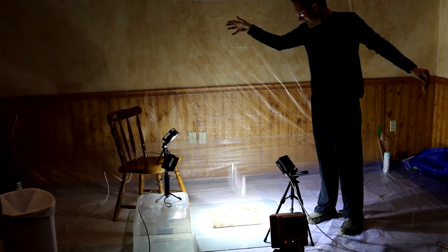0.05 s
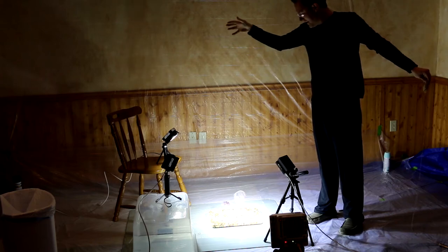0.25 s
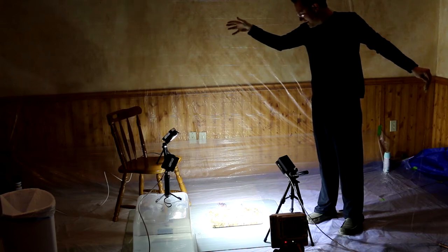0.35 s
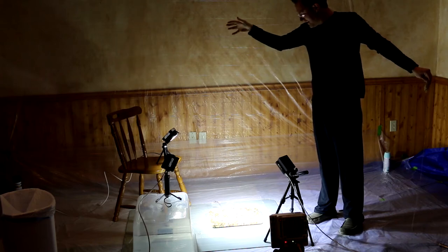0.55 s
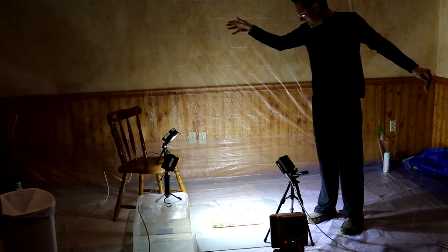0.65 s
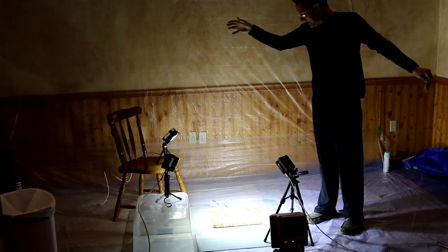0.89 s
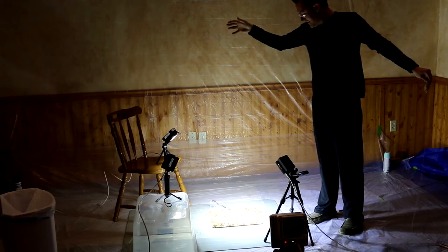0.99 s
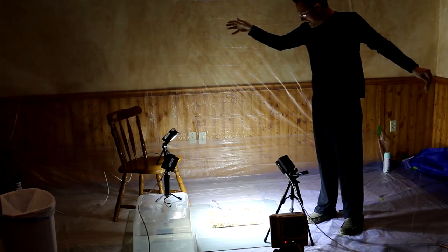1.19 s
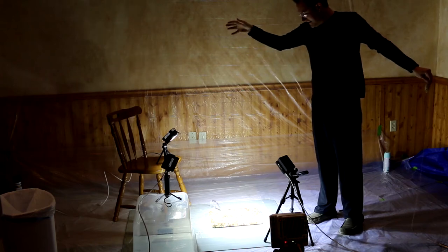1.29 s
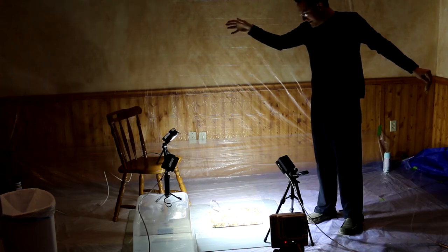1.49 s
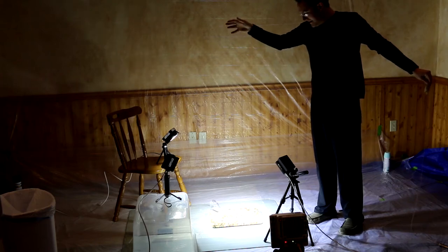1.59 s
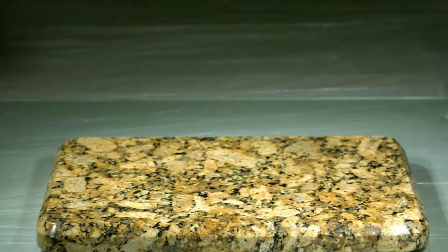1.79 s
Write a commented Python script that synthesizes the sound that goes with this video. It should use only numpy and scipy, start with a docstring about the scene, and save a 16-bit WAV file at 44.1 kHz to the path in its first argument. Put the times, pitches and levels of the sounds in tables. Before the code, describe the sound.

A glass smashes on a stone slab, then fragments clink and scatter in a small room.

```python
"""A small room lined with plastic sheet: a dropped glass smashes on a stone slab.
The bowl cracks, the slab knocks, and splinters and ringing shards spray out. Pieces thud and clatter
on the covered floor and slide, crackling the sheet. The largest rocks and clinks to rest.
Room tone and a low rumble lie underneath."""
import sys
import numpy as np
from scipy import signal
from scipy.fft import rfft, irfft
from scipy.io import wavfile

SR = 44100
rng = np.random.default_rng(int(sys.argv[2]) if len(sys.argv) > 2 else 0)


def generate_wav(sig):
    """Save sig (samples, or channels by samples) to the path in sys.argv[1] as 16-bit PCM at SR."""
    pcm = np.round(np.clip(np.atleast_2d(sig).T, -1, 1) * 32767).astype(np.int16)
    wavfile.write(sys.argv[1], SR, pcm)


N = 81585
T = np.arange(N) / SR
CUTOFF_HZ = 15900
SIDE = np.array([[1], [-1]])   # left, right sign

# left-right likeness: freq_hz, correlation
STEREO_CORRELATION = [(250, 0.99), (1200, 0.91), (2400, 0.7), (5000, 0.23), (14000, 0.15)]
# pieces hitting the floor: start_s, level_db, t60_s
FLOOR_HITS = [(0.4437, -17, 0.32), (0.4637, -12.5, 0.086), (.479, -25, 0.13), (0.6145, -16, 0.11),
              (0.625, -28.5, 0.15), (0.6758, -16.5, 0.093), (0.8422, -28, 0.2), (1.2902, -30, 0.14)]


def from_db(db):
    return 10 ** (np.asarray(db) / 20)


def unit_rms(x):
    return x / np.sqrt(np.mean(x ** 2) + 1e-20)


def at_hz(points, hz):
    """Table lookup on a log-frequency axis."""
    freqs_hz, values = np.transpose(points)
    return np.interp(np.log(hz), np.log(freqs_hz), values)


def low_cut(x, hz):
    return signal.sosfilt(signal.butter(2, hz, "high", fs=SR, output="sos"), x + 1e-18)


def level_curve(rows):
    """Gain over time, silent before the first point."""
    return from_db(np.interp(T, *np.transpose(rows))) * (T >= rows[0][0])


def decay(start_s, t60_s, attack_s=1e-5):
    """Quick rise, exponential fall."""
    age_s = np.maximum(T - start_s, 0)
    return (1 - np.exp(-age_s / attack_s)) * np.exp(-np.log(1000) * age_s / t60_s)


def bursts(rows):
    """Summed decay envelopes."""
    return sum(from_db(db) * decay(start_s, t60_s) for start_s, db, t60_s in rows)


def stereo(mid, side, hz):
    """Two unrelated signals to a pair, less alike in the treble."""
    correlation = at_hz(STEREO_CORRELATION, hz)
    return np.sqrt(1 + correlation) * mid + np.sqrt(1 - correlation) * side * SIDE


def coloured(white, spectrum):
    """Two white rows to stereo with this spectral shape; rms 1."""
    hz = np.maximum(np.arange(N // 2 + 1) * SR / N, 1)
    mid, side = rfft(white) * from_db(at_hz(spectrum, hz)) * (hz < CUTOFF_HZ)
    return unit_rms(irfft(stereo(mid, side, hz), N))


def noise(spectrum):
    return coloured(rng.standard_normal((2, N)), spectrum)


def grains(per_s, spread_db=1.5):
    """Random clicks of uneven size, two rows."""
    sizes = from_db(spread_db * np.minimum(rng.exponential(1, N), 4))
    return (rng.random(N) < per_s / SR) * sizes * rng.standard_normal((2, N))


def pings(spectrum, pieces, per_s=5000, t60_cycles=160, top_hz=6000):
    """Random contacts dealt to small pieces of glass, one resonance each; rms 1."""
    clicks = grains(per_s)
    piece_hit = rng.integers(0, pieces, N)
    pitches_hz = np.geomspace(1500, top_hz, pieces) * rng.uniform(.98, 1.02, pieces)
    out = 0
    for piece, hz in enumerate(pitches_hz):
        radius = np.exp(-np.log(1000) * hz / (t60_cycles * SR))
        angle = 2 * np.pi * hz / SR
        contacts = stereo(*clicks, hz) * (piece_hit == piece)
        ring = signal.lfilter([1, 0, -1], [1, -2 * radius * np.cos(angle), radius ** 2], contacts + 1e-18)
        out += from_db(at_hz(spectrum, hz)) * angle * ring
    return unit_rms(out)


def wavering_tone(hz):
    """Sine with wandering level and phase; the channels differ more as pitch rises."""
    depth, step, warmup_steps = .7, 64, 200
    waver_hz = 10 + 4 * hz / 1000
    pole = np.exp(-2 * np.pi * waver_hz * step / SR)
    white = rng.standard_normal((4, N // step + warmup_steps))
    slow = unit_rms(signal.lfilter([1], [1, -2 * pole, pole ** 2], white)[:, warmup_steps:])
    drifts = [np.interp(T * SR / step, np.arange(len(row)), row) for row in slow]
    sin_mid, cos_mid, sin_side, cos_side = drifts
    width = .95 * min(hz / 2800, 1) * SIDE
    sin_gain = 1 + depth * (sin_mid + width * sin_side) / 2
    cos_gain = depth * (cos_mid + width * cos_side) / 2 + width * rng.choice([-.5, .5])
    phase = 2 * np.pi * hz * T
    return unit_rms(sin_gain * np.sin(phase) + cos_gain * np.cos(phase)) / np.sqrt(2)


def background():
    """Steady room tone and a low rumble that swells and dips."""
    # room tone: freq_hz, density_db
    air_spectrum = [(25, -19), (55, -22), (125, -6), (213, -16.5), (1240, -23.5), (2200, -19), (8000, -36),
                    (15000, -50)]
    # rumble: freq_hz, density_db
    rumble_spectrum = [(30, -43.5), (60, -11), (118, 0), (150, -2), (200, -22.5), (900, -41.5)]
    # time_s, level_db
    rumble_levels = [(0, -45), (.2, -42.5), (.235, -34.5), (.29, -45.5), (.8, -51), (1.1, -44), (1.32, -37),
                     (1.45, -47), (1.58, -37.5), (1.76, -38)]
    return from_db(-45) * noise(air_spectrum) + level_curve(rumble_levels) * noise(rumble_spectrum)


def reverb(x, wet_db):
    """The room's short diffuse tail."""
    # freq_hz, gain_db
    tail_spectrum = [(100, 4), (320, -9), (700, 1), (4000, -9), (16000, 4)]
    tail = noise(tail_spectrum) * decay(start_s=.0074, t60_s=.68)
    tail /= np.sqrt(np.sum(tail ** 2) / 2)
    return from_db(wet_db) * signal.fftconvolve(x, tail, axes=1)[:, :N]


def sheet():
    """Sliding pieces tinkle and crackle the plastic; then it settles."""
    # glass on plastic: freq_hz, level_db
    slide_spectrum = [(40, -38.5), (120, -19.5), (250, -14), (500, -19.5), (1000, -2), (1350, -8),
                      (1650, -0.5), (2400, -1.5), (3750, -5.5), (5600, -15), (15000, -38)]
    # time_s, level_db
    slide_levels = [(.222, -50), (.42, -30), (.5, -27.5), (.58, -32.5), (.71, -29), (.745, -24.5),
                    (.83, -28.5), (.9, -70), (1.0, -51.5), (1.32, -42), (1.48, -60)]
    # sheet settling: start_s, level_db, t60_s
    rustles = [(1.515, -36.5, .26), (1.645, -38, .18), (1.722, -39, .22)]
    # freq_hz, density_db
    rustle_spectrum = [(300, -5), (900, -6.5), (2300, 2), (4500, -1), (8000, -3.5), (15000, -11)]
    tinkle = pings(slide_spectrum, pieces=20)
    crackle = coloured(grains(per_s=12000, spread_db=.2), slide_spectrum)
    settling = bursts(rustles) * coloured(grains(per_s=5000), rustle_spectrum)
    return level_curve(slide_levels) * unit_rms(tinkle + crackle) + settling


def thuds():
    """The floor gives under each landing: a soft low thud."""
    # freq_hz, density_db
    thud_spectrum = [(25, -44), (60, -21.5), (160, 0), (300, -6.5), (600, -3.5), (1200, -19)]
    envelope = sum(from_db(db - 24) * decay(start_s, t60_s=.18) for start_s, db, _ in FLOOR_HITS)
    return envelope * noise(thud_spectrum)


def landings():
    """Pieces clatter on the floor; the heaviest gives a short hard slap."""
    # freq_hz, level_db
    clatter_spectrum = [(150, -26), (400, -22), (900, -1.5), (1300, -8), (1700, 2.5), (2500, 3), (4000, 0),
                        (6500, -13), (15000, -30)]
    slap_s, slap_db, slap_hz, slap_length_s = .4623, 1, 2350, .0044
    window = np.sin(np.pi * np.clip((T - slap_s) / slap_length_s, 0, 1))
    slap = from_db(slap_db) * window * np.sin(2 * np.pi * slap_hz * (T - slap_s))
    clinks = pings(clatter_spectrum, pieces=16)
    scuff = from_db(-4) * coloured(grains(per_s=9000), clatter_spectrum)
    return slap + bursts(FLOOR_HITS) * unit_rms(clinks + scuff)


def knocks():
    """The largest piece rocks on the covered floor: dull contact noise plus damped modes."""
    # knocks through the sheet: start_s, level_db
    contacts = [(0.4394, -26), (0.6163, -20.5), (1.0223, -28), (1.1045, -23), (1.2225, -31.5), (1.245, -30),
                (1.2884, -21), (1.549, -34.5), (1.657, -37)]
    # pitch_hz, level_db, t60_s
    modes = [(1555, 2, .11), (1640, -5, .09), (1765, -6, .1), (1830, -1, .014), (2425, -8, .12)]
    # freq_hz, density_db
    contact_spectrum = [(700, -22), (1300, -25), (1550, -2), (1850, 1.5), (2150, -10), (2450, -5.5),
                        (3200, -16.5), (8000, -41)]
    envelope = sum(from_db(db - 10) * decay(start_s, t60_s=.09) for start_s, db in contacts)
    clunks = envelope * noise(contact_spectrum)
    for start_s, db in contacts:
        for hz, mode_db, t60_s in modes:
            pitch_hz = hz * rng.uniform(.99, 1.01)
            tone = np.sin(2 * np.pi * (pitch_hz * (T - start_s) + rng.random()))
            clunks += from_db(db + mode_db) * decay(start_s, t60_s, attack_s=.0014) * tone
    return clunks + reverb(clunks, wet_db=-19.5)


def large_piece():
    """Each touch adds energy to the same modes of the largest piece; close pairs beat."""
    # glass modes: pitch_hz
    pitches_hz = [866, 881, 3611, 3670, 8895, 9060, 13530, 15590]
    # per pitch: level_db, t60_s
    modes = [(-16, .3), (-12, .33), (-5, .36), (1.5, .38), (-7, .24), (-13, .3), (-14, .22), (-18, .22)]
    # start_s, level_db, low_boost_db, high_boost_db
    touches = [(.246, -35, 4, 10), (.32, -28.5, 2, -2), (.391, -22.5, -3, -5), (.478, -32.5, 19, 9),
               (.499, -19.5, -21, -19), (.55, -21, 3, -10), (.619, -24.5, 8, -1), (.664, -21.5, -28, 2),
               (.848, -31.5, -20, -2), (.931, -41.5, 6, 9.5), (.972, -28, -2, -.5), (1.038, -33, 4, -3),
               (1.1053, -31, 6, -7.5), (1.128, -30, -8, 1), (1.225, -32, -3, 2), (1.266, -33, 0, 10),
               (1.313, -22, -6, -5), (1.409, -26, -7, -5), (1.665, -35, 4, -4)]
    out = 0
    for hz, (mode_db, t60_s) in zip(pitches_hz, modes):
        energy = 0
        for start_s, db, low_boost_db, high_boost_db in touches:
            strength = from_db(db + (hz < 2000) * low_boost_db + (hz > 6000) * high_boost_db)
            energy += (strength * decay(start_s, t60_s, attack_s=.0015)) ** 2
        out += from_db(mode_db) * np.sqrt(energy) * wavering_tone(hz)
    return out


def spray():
    """A shower of ringing splinters, with sharp ticks and a hiss of glass dust."""
    # freq_hz, level_db
    splinter_spectrum = [(200, -45), (400, -30), (580, -3.5), (1200, -3.5), (6000, 0), (12000, -4),
                         (14000, -14.5), (16000, -6)]
    # time_s, level_db
    spray_levels = [(.222, -28), (.26, -25.5), (.31, -30), (.48, -32), (.66, -30.5), (.76, -51), (.86, -65),
                    (.93, -55.5)]
    # glass on glass: start_s, level_db, t60_s
    ticks = [(.2435, -13.5, .06), (.4423, -24, .16), (.4803, -25.5, .073), (.6234, -26, .075),
             (.7975, -34, .05), (1.0145, -43, .05), (1.19, -44, .04), (1.268, -32, .025),
             (1.2885, -41, .02), (1.3135, -38, .025)]
    ringing = pings(splinter_spectrum, pieces=64, per_s=1500, t60_cycles=2200, top_hz=15000)
    ringing = low_cut(ringing, hz=730)   # tiny pieces radiate no bass
    dust = coloured(grains(per_s=12000, spread_db=2), splinter_spectrum)
    return level_curve(spray_levels) * (ringing + from_db(-8.5) * dust) + bursts(ticks) * dust


def shards():
    """Each flying shard rings at one pitch."""
    # start_s, pitch_hz, relative_db, t60_s
    rings = [(.2225, 5830, -12, .07), (.244, 4394, -17, .04), (.246, 7510, -19, .18),
             (.246, 12600, -23, .25), (.25, 5749, -31, .45), (.25, 8995, -28, .3), (.272, 6712, -30, .7),
             (.28, 2795, -30, .9), (.29, 2040, -33, .7), (.29, 5160, -31, .6), (.29, 9705, -29, .6),
             (.32, 3910, -29, .5), (.33, 1550, -36, .7), (.342, 4818, -28, .45), (.39, 4819, -27, .4),
             (.345, 7525, -28, .6), (.385, 6243, -28, .8), (.435, 7524, -23, .22), (.44, 9705, -22, .17),
             (.468, 2490, -26, .25), (.48, 5152, -31, .6), (.492, 11160, -27, .2), (.505, 8603, -30, .35),
             (.55, 9702, -25, .3), (.552, 12520, -23, .16), (.586, 1965, -27, .4), (.587, 6715, -25, .45),
             (.622, 12550, -24, .1), (.675, 2870, -29, .3), (.68, 7522, -33, .45), (.68, 6240, -38, .55),
             (.70, 765, -36, .5), (.72, 2476, -30, .5), (.775, 765, -34, .28), (.844, 2010, -31, .3),
             (1.0145, 5195, -36, .08), (1.0145, 9730, -41, .07), (1.267, 8950, -28, .05),
             (1.288, 4600, -31, .04), (1.313, 4400, -36, .08)]
    return sum(from_db(db + 1) * decay(start_s, t60_s, attack_s=.0015) * wavering_tone(hz)
               for start_s, hz, db, t60_s in rings)


def crack():
    """The bowl bursts with little bass; the slab knocks and rings briefly."""
    # freq_hz, density_db
    crack_spectrum = [(150, -27), (330, -14.5), (520, 0), (720, 6.5), (1050, -5.5), (1700, 0.5), (2800, -2),
                      (6000, -11.5), (16000, -18)]
    # hollow knock: delay_s, pitch_hz, level_db, t60_s
    slab_modes = [(0, 660, -6, .028), (.0005, 870, -7, .02), (.002, 1420, -14, .035),
                  (.0022, 1740, 0, .018)]
    # after-ring: freq_hz, density_db
    slab_spectrum = [(60, -29), (130, -6), (300, -23), (480, -13.5), (640, -1), (1750, -4), (7000, -26),
                     (16000, -26.5)]
    break_s, hold_s, fall_s = .2223, .0026, .0008
    envelope = (T >= break_s) * np.exp(-np.maximum(T - break_s - hold_s, 0) / fall_s)
    snap = from_db(-3) * envelope * noise(crack_spectrum)
    knock = 0
    for delay_s, hz, db, t60_s in slab_modes:
        start_s = break_s + delay_s
        tone = np.sin(2 * np.pi * hz * (T - start_s))
        knock += from_db(db) * decay(start_s, t60_s, attack_s=.0006) * tone
    after_ring = from_db(-12.5) * decay(break_s, t60_s=.15) * noise(slab_spectrum)
    return low_cut(snap + knock, hz=380) + after_ring


def scene():
    """Debris with reverb, crack and thuds without; left 1 dB louder than right."""
    debris = shards() + large_piece() + knocks() + landings() + spray() + sheet()
    mix = background() + crack() + debris + reverb(debris, wet_db=-7) + thuds()
    return mix * from_db(.5 * SIDE)


def record(dry):
    """The hardest blows clip; hard stop at end_s, steep low-pass."""
    end_s = 1.762
    clipped = np.clip(dry, -.95, .95) * (T < end_s)
    return signal.sosfilt(signal.ellip(10, .1, 80, CUTOFF_HZ, fs=SR, output="sos"), clipped)


dry = scene()
out = record(dry)
generate_wav(out)
```